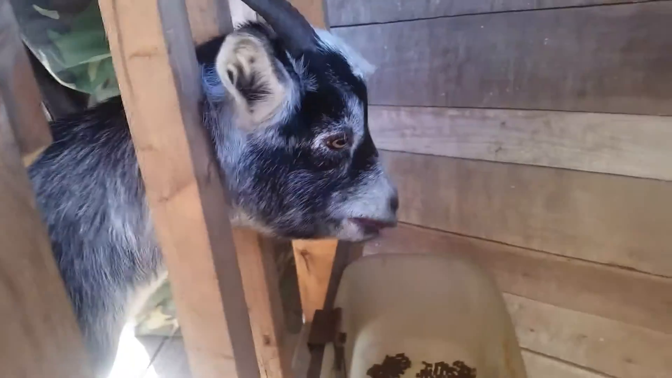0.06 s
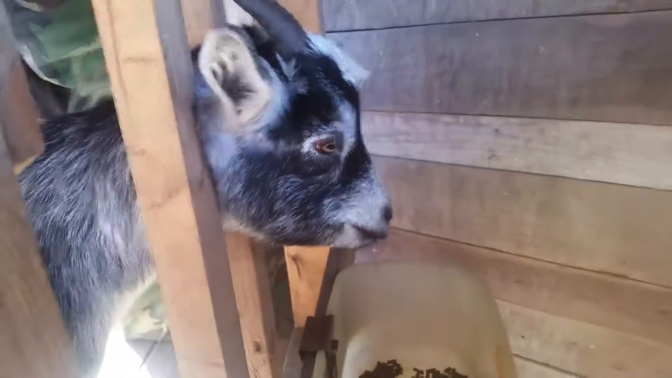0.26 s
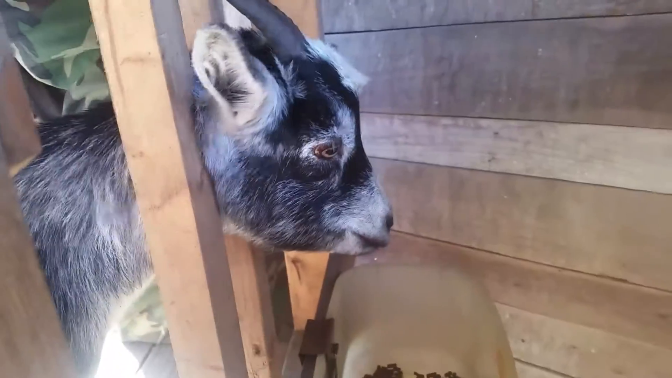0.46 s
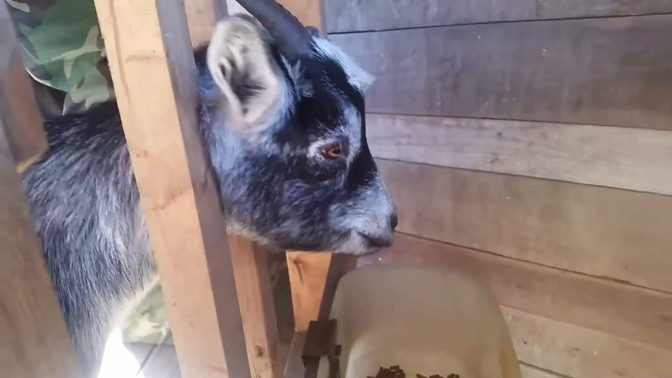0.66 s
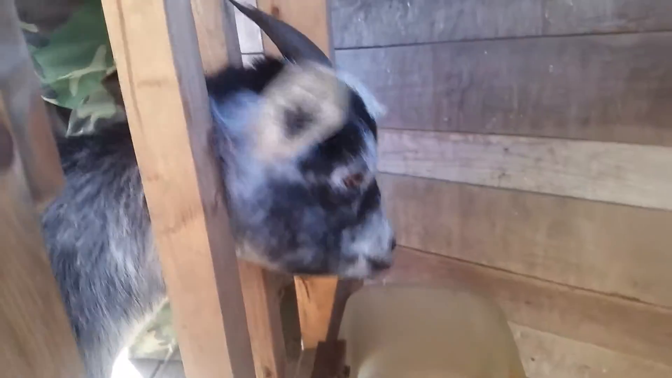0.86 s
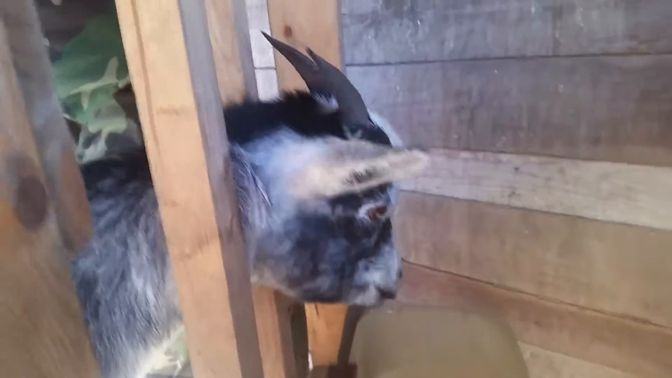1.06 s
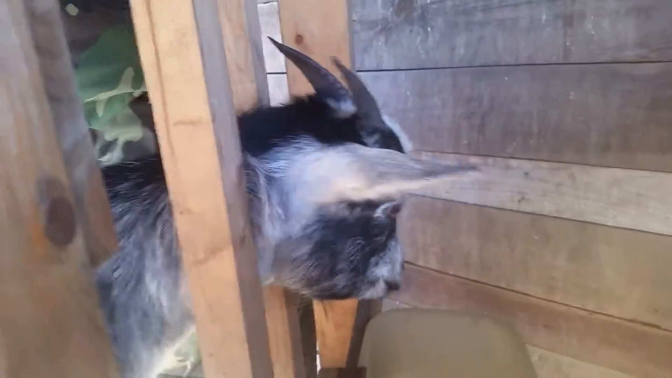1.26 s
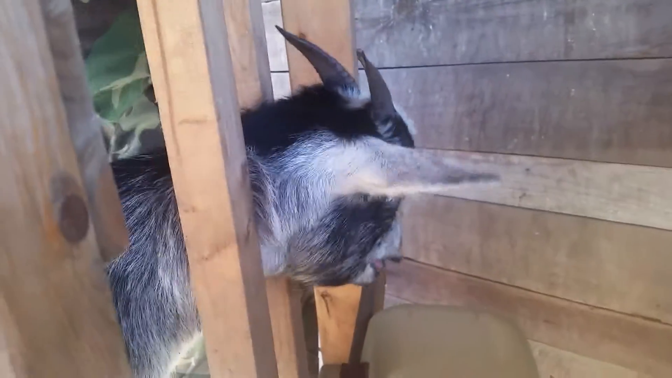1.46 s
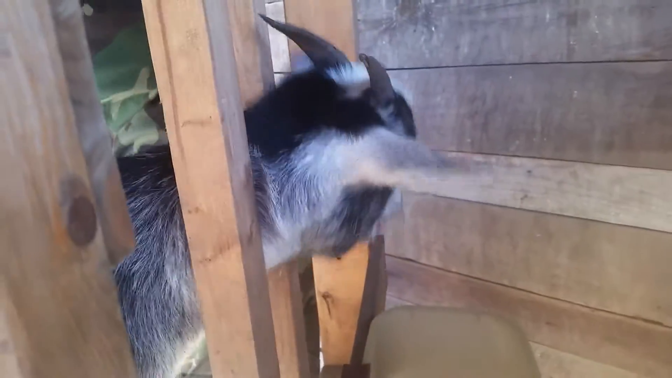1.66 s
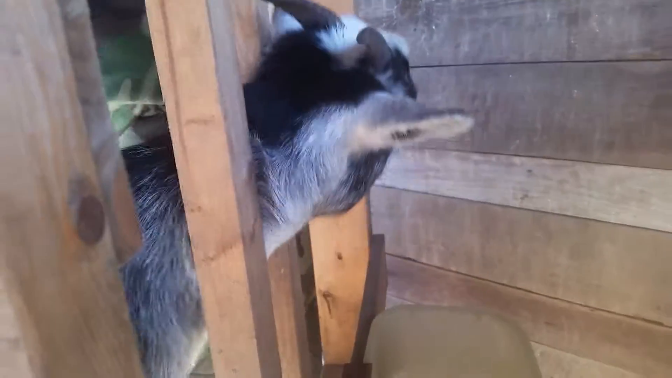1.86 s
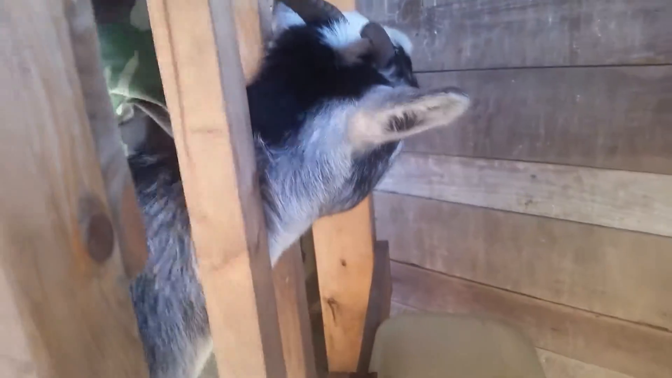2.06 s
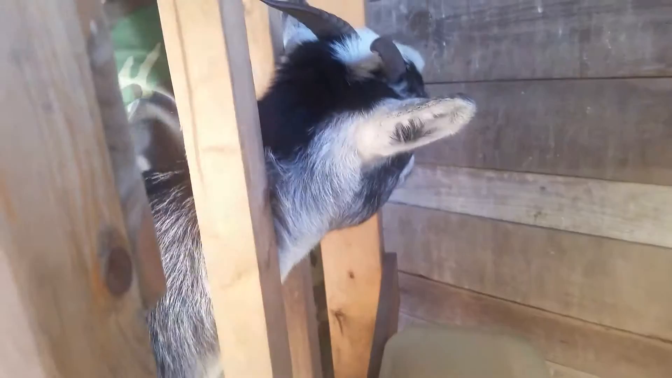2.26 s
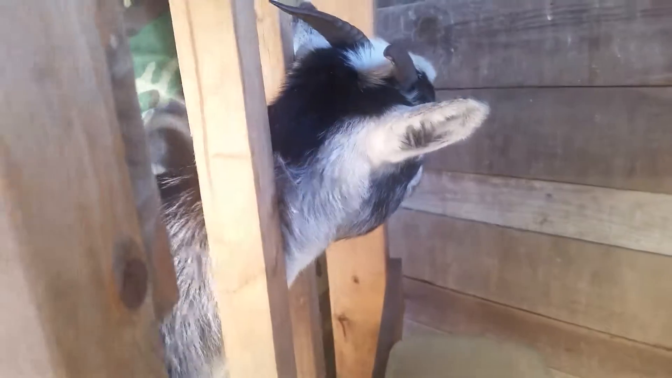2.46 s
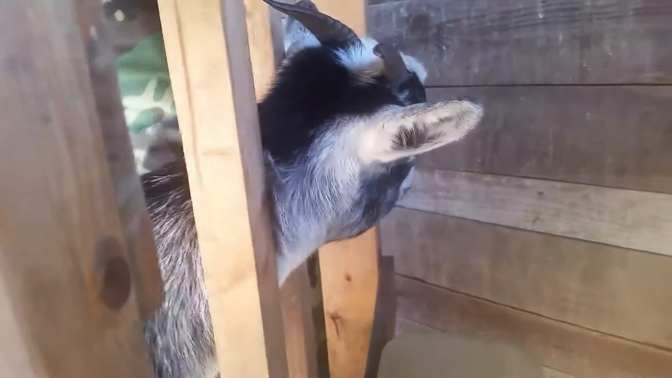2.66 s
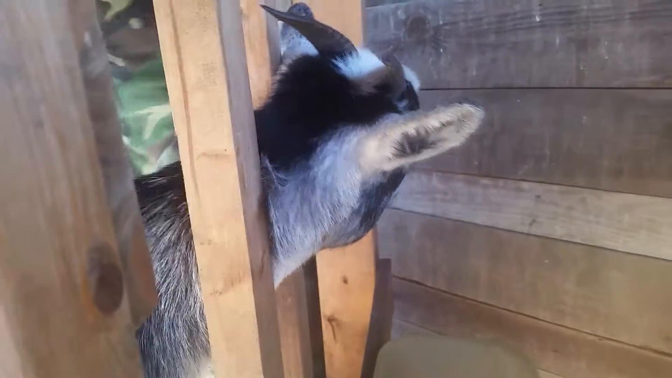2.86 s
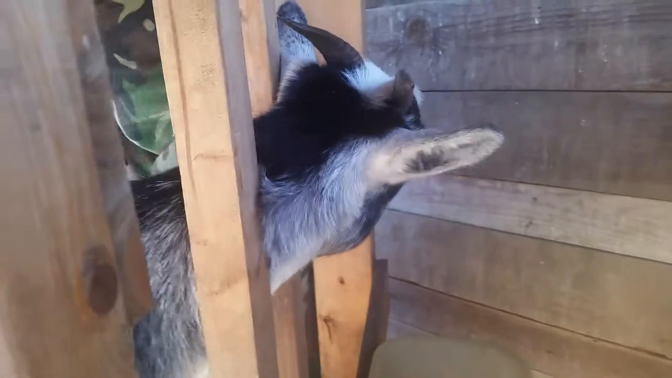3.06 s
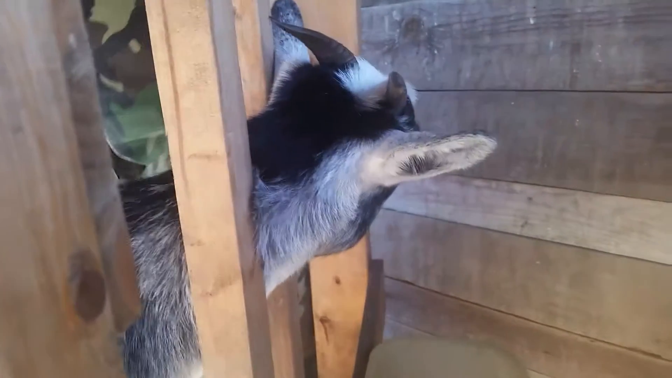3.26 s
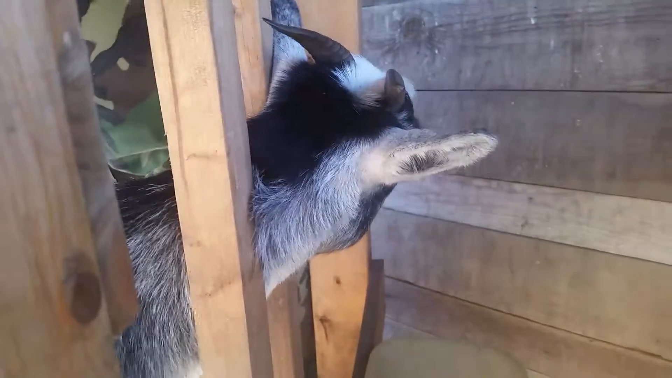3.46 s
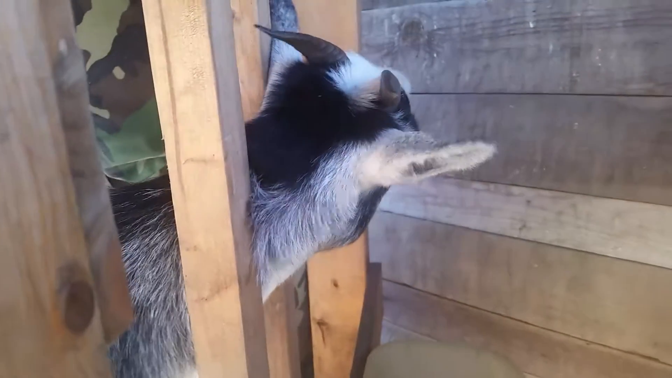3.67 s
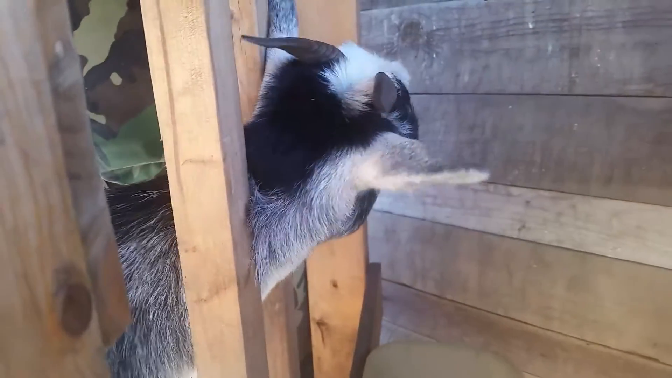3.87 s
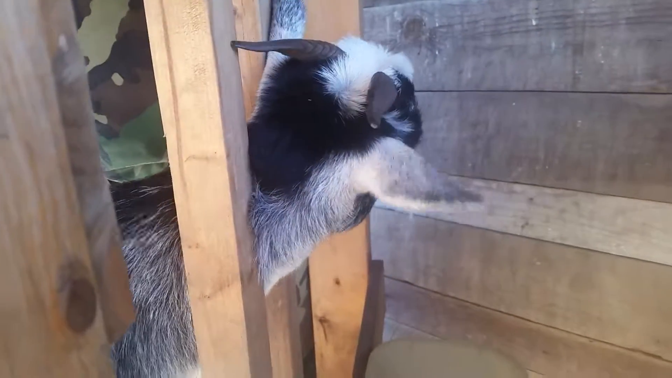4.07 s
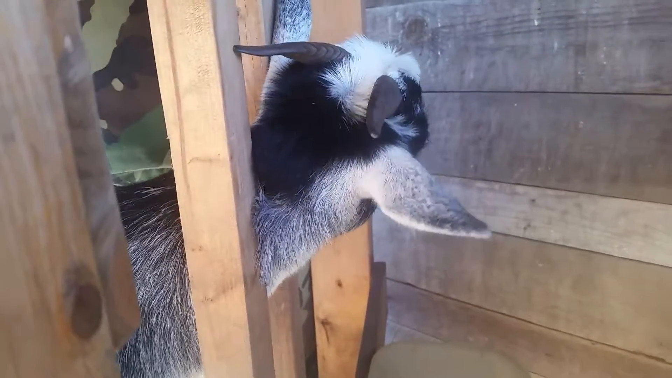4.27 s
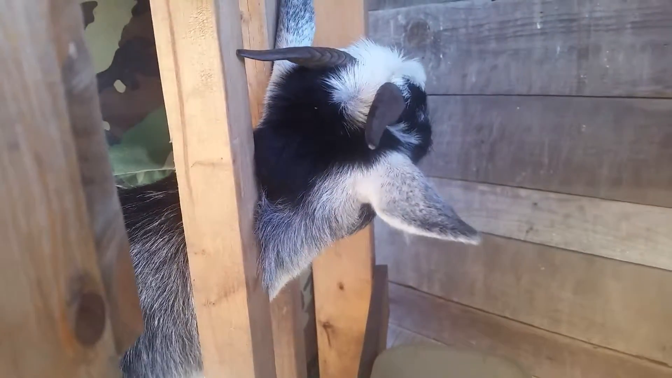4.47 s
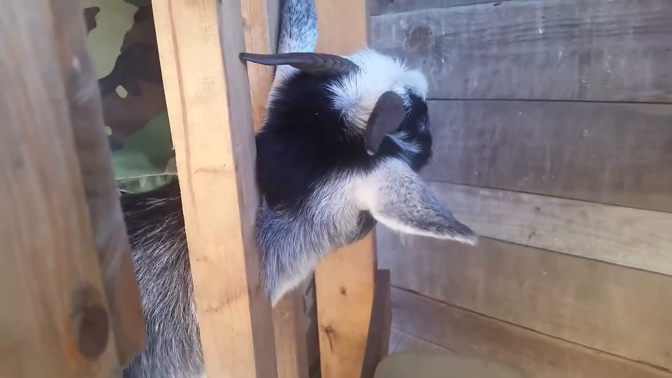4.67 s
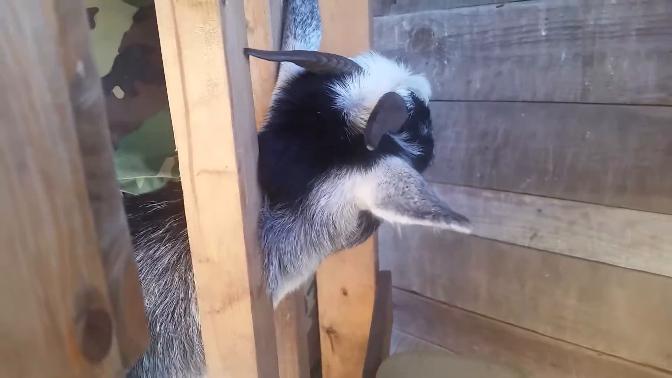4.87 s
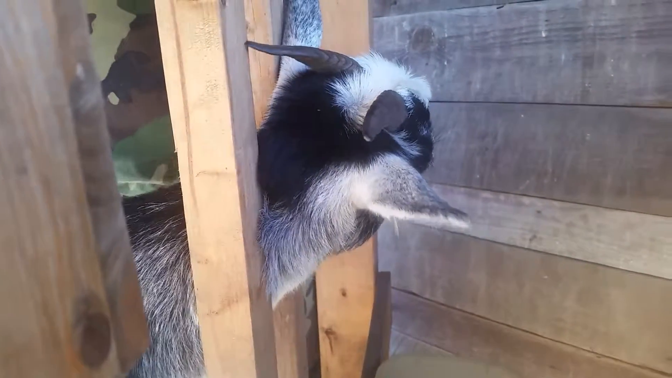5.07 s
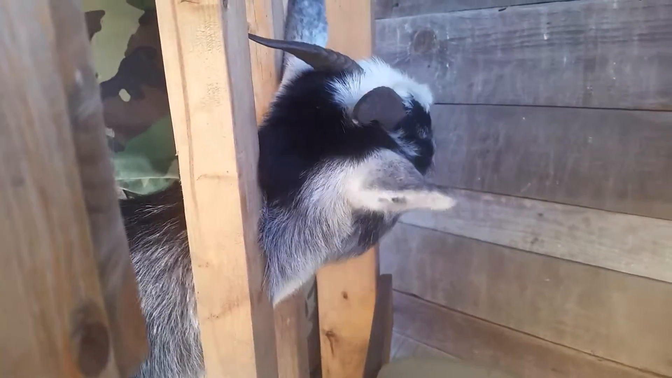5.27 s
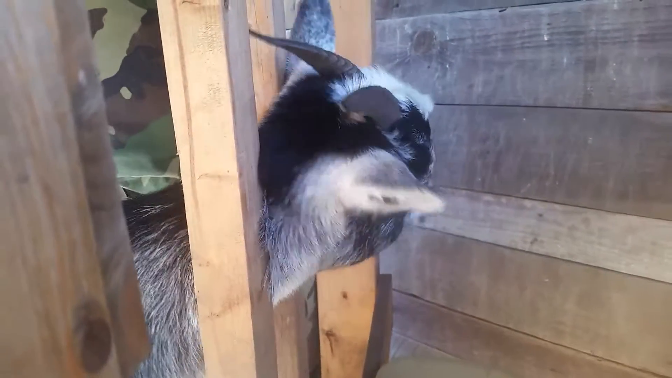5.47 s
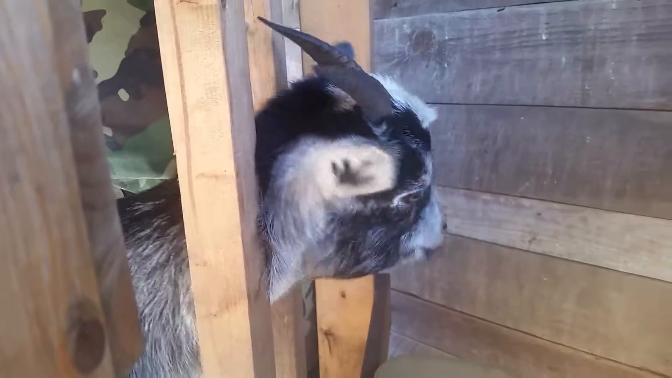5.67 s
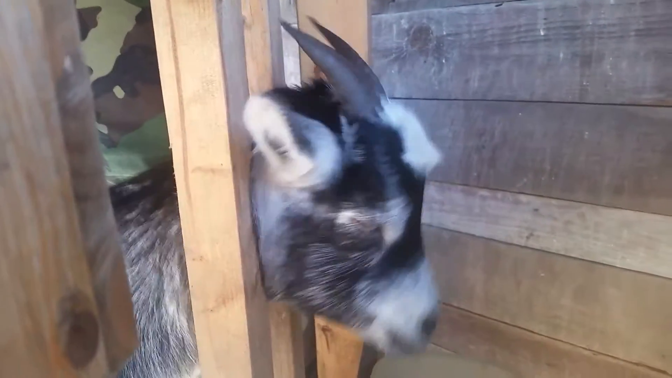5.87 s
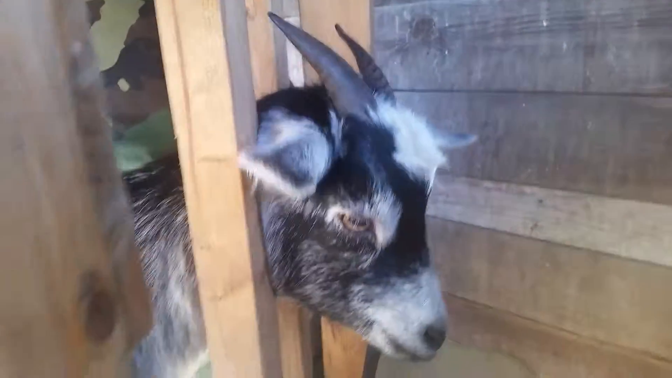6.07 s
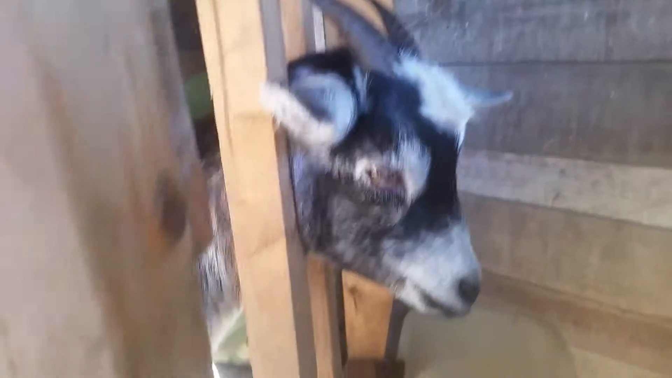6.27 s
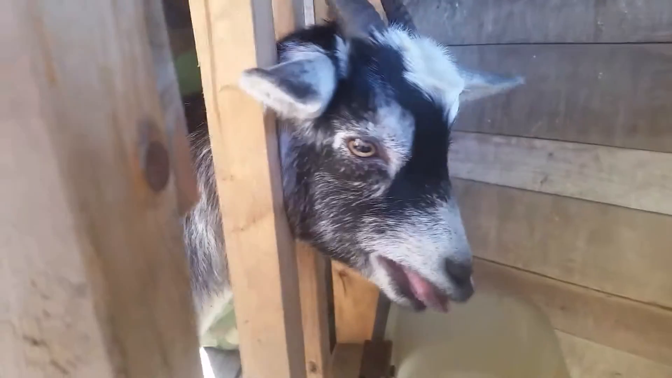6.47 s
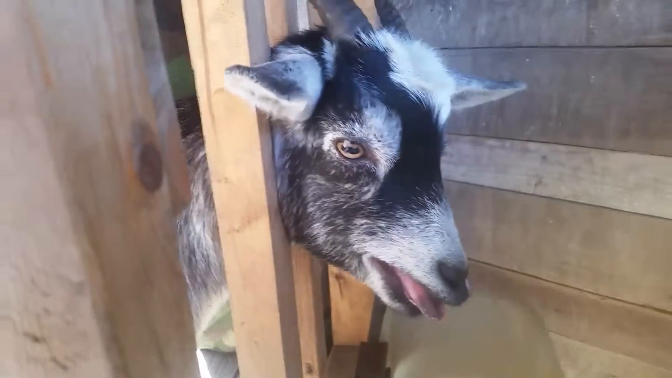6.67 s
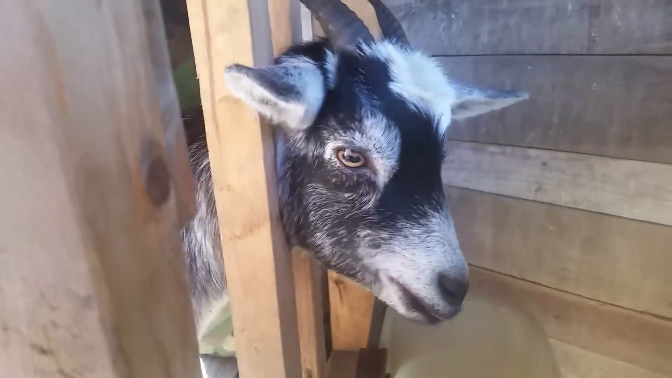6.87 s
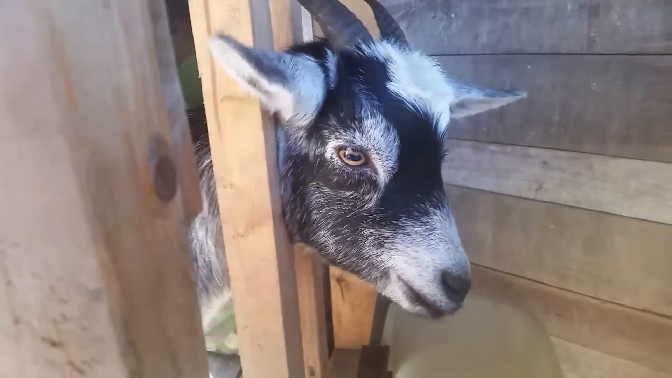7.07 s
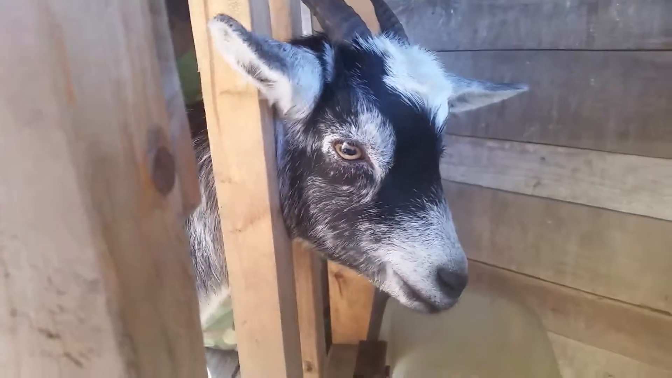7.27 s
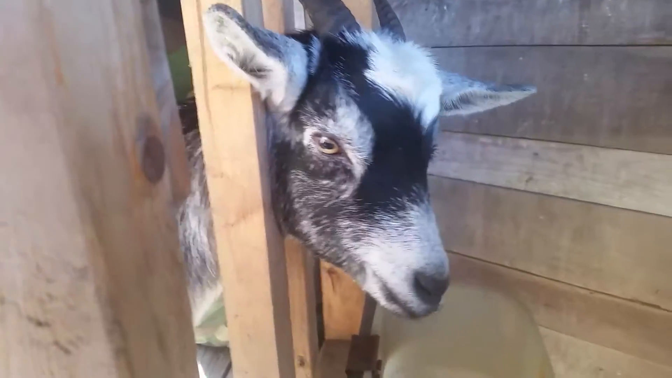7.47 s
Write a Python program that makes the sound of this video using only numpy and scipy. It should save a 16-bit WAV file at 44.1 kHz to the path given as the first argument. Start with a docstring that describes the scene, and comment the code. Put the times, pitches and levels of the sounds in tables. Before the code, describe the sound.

A young goat's quavering bleats, the tail of one and then three more, close in a wooden stall with ticks, rustling straw and shrill insects.

```python
"""First comes the end of a young goat's bleat, then three more, from a head pushed through a stall's wooden bars.
The voice is quavering pulses mixed with breath that ring a throat; bars and planks answer with short echoes.
Hooves and bars tick and straw rustles, as short bursts and swells of shaped noise, with dull pushes on the wood.
Behind lie far rumble and insects shrilling on the left, both shaped noise. All is heard close, by a phone."""
import sys
import numpy as np
from scipy import signal
from scipy.fft import rfft, irfft, next_fast_len
from scipy.io import wavfile
from scipy.ndimage import uniform_filter1d, map_coordinates

SR = 44100
rng = np.random.default_rng(int(sys.argv[2]) if len(sys.argv) > 2 else 0)


def put_to_file(sound):
    """Save the sound as 16-bit audio at rate SR, in the file named by the first command-line argument."""
    columns = np.atleast_2d(sound).T  # one column per channel
    safe = np.clip(columns, -1, 1)
    whole_steps = np.round(safe * 32767)
    wavfile.write(sys.argv[1], SR, whole_steps.astype(np.int16))


N = 332073
TOP_HZ = 15900  # highest overtone of the voice, and the phone's band limit


def amp(db):
    """Turn decibels into a plain multiplier."""
    return 10 ** (np.asarray(db) / 20)


def unit(x):
    """Scale to an average (rms) strength of 1."""
    return x / np.sqrt(np.mean(x ** 2) + 1e-20)


def along(points, hz):
    """Read a (frequency, value) curve on a log frequency axis."""
    f, v = np.transpose(points)
    return np.interp(np.log(hz + 1), np.log(f + 1), v)


def curves(rows, t):
    """Read every column after the first as a curve over time."""
    s, *cols = np.transpose(rows)
    return [np.interp(t, s, c) for c in cols]


def wobble(rate, size):
    """A smooth random curve with rate random points a second."""
    points = rng.standard_normal(int(size * rate / SR) + 4)
    return map_coordinates(points, [np.arange(size) * rate / SR])


def swells(s, length, db):
    """A sum of bell-shaped rises in level."""
    t = np.arange(N) / SR
    return sum(amp(c) * np.exp(-((t - a) / b) ** 2) for a, b, c in zip(s, length, db))


def filtered(x, response):
    """Multiply the spectrum of x by a response that depends on frequency."""
    n = x.shape[-1]
    m = next_fast_len(n + 8192)  # spare room for ringing
    return irfft(rfft(x, m) * response(np.fft.rfftfreq(m, 1 / SR)), m)[..., :n]


def band(c_hz, width_hz):
    """One resonance that rings after it is struck, with gain 1 at its centre."""
    return lambda f: 1j * f * width_hz / (c_hz * c_hz - f * f + 1j * f * width_hz)


def rush(spectrum, alike, left_db, patchy_db):
    """Shaped stereo noise with random louder patches; its left-right average has strength 1."""
    z = signal.stft(rng.standard_normal((2, N)), nperseg=512)[2]
    field = rng.standard_normal(z.shape[1:])
    field = uniform_filter1d(uniform_filter1d(field, 6, 0), 10, 1)  # smooth over frequency, then time
    pair = signal.istft(z * amp(patchy_db * unit(field)), nperseg=512)[1][:, :N]
    turn = np.arccos(np.clip(alike, 0, 1)) / 2  # more alike: less of the side signal
    shaped = filtered(pair, lambda hz: amp(along(spectrum, hz)))
    mid, side = shaped * [[np.cos(turn)], [np.sin(turn)]]
    both = np.array([mid + side, mid - side]) * amp([[left_db / 2], [-left_db / 2]])
    return both / np.std(both.mean(axis=0))


# rise and fall of the far rumble: (time [s], level [dB])
RUMBLE_LEVEL = [(0, -46.5), (.4, -56.5), (2.4, -49.5), (3.4, -46), (4.3, -54.5), (6.4, -52.5), (7.3, -50)]
# its tone colour, only the shape counts: (frequency [Hz], density [dB per Hz])
RUMBLE_COLOUR = [(12, -42), (20, -11.5), (54, -0.5), (92, 2.5), (168, -5), (225, -6), (400, -23),
                 (520, -40), (880, -120)]


def far_rumble():
    """Low noise, nearly the same in both ears, slowly changing in level."""
    level = amp(curves(RUMBLE_LEVEL, np.arange(N) / SR)[0])
    return level * rush(RUMBLE_COLOUR, .93, left_db=-1.0, patchy_db=-0.5)


# tone colour of the insects, only the shape counts: (frequency [Hz], density [dB per Hz])
INSECT_COLOUR = [(1940, -34), (3300, -20), (3390, -5), (4020, 6.5), (4450, 3), (5500, -7.5), (7150, -25.5),
                 (12100, -120)]


def insects():
    """A steady shrill band of noise, far stronger on the left."""
    return amp(-64.5) * rush(INSECT_COLOUR, .05, left_db=19.0, patchy_db=0.5)


# straw and fur rubbing: (time [s], half length [s], rustle level [dB], hiss level [dB])
STRAW_RUBS = [(.15, .1, -55, -56), (.93, 0.031, -62, -62.5), (1.27, 0.11, -66, -70.5),
              (2.11, 0.037, -55.5, -47), (2.3, 0.12, -67, -62), (2.55, .15, -72.5, -56),
              (2.82, 0.12, -50.5, -49), (3, 0.59, -66, -62.5), (5.31, 0.016, -49, -64.5),
              (7.1, .08, -66.5, -78.5)]
# tone colours, only the shape counts: (frequency [Hz], density [dB per Hz])
RUSTLE_COLOUR = [(240, -31.5), (400, -1.5), (470, 2), (1130, -3.5), (3400, -8), (4420, -43.5), (7480, -120)]
HISS_COLOUR = [(3180, -37.5), (5400, -8), (6830, -9), (9980, -5.5), (15900, -2.5)]


def straw():
    """Rubbing makes a middle rustle and a high hiss swell over a faint steady bed."""
    s, length, rustle_db, hiss_db = np.transpose(STRAW_RUBS)
    rustle_level = amp(-64) + swells(s, length, rustle_db)
    hiss_level = amp(-67) + swells(s, length, hiss_db)
    rustle = rustle_level * rush(RUSTLE_COLOUR, .15, left_db=1.5, patchy_db=1.5)
    hiss = hiss_level * rush(HISS_COLOUR, .05, left_db=-2.5, patchy_db=1.5)
    return rustle + hiss


# dull pushes on the wood: (time [s], half length [s], level [dB])
PUSHES = [(0.096, 0.033, -34.5), (0.154, 0.083, -44), (1.327, 0.32, -54), (1.821, 0.041, -44),
          (2.566, 0.035, -37), (2.828, 0.1, -48), (3.3, 0.38, -67), (7.05, 0.095, -52.5)]
# their tone colour, only the shape counts: (frequency [Hz], density [dB per Hz])
PUSH_COLOUR = [(100, -11.5), (220, 0), (450, -7.5), (900, -34.5)]


def wood_pushes():
    """Pressing on the wood gives soft swells of low noise, much alike in both ears."""
    return swells(*np.transpose(PUSHES)) * rush(PUSH_COLOUR, 0.94, left_db=-1.5, patchy_db=-2.0)


def yard():
    """Everything around the goat except the separate ticks."""
    return far_rumble() + insects() + straw() + wood_pushes()


# hooves and bars: (time [s], knock level [dB], thud over knock [dB], crack over knock [dB])
CONTACTS = [(0.164, -32.5, 5, -9.5), (0.466, -48.5, -4, -4), (0.489, -58, 14.5, -13), (0.901, -46, -18, 3),
            (0.91, -53.5, -14, 10.5), (1.164, -63.5, -10, 11.5), (1.239, -45, -19, -6.5),
            (1.264, -39, -6, -12), (2.159, -51, 1, -10.5), (2.923, -47.5, -7, -2),
            (2.981, -58.5, -22, 18.5), (3.001, -50, -3, 11), (3.127, -59.5, -19, 11.5), (3.458, -55, -8, 6),
            (3.49, -45.5, -4, -16.5), (5.169, -55, -10, 8), (5.29, -29, -18, -18), (5.295, -51.5, -7, 4),
            (5.329, -52.5, 5, -2.5)]


def ticks():
    """Each contact is a woody knock, a treble crack and a low thud, each dying at its own speed."""
    out, t = np.zeros((2, N + SR)), np.arange(SR // 4) / SR
    onset = 1 - np.exp(-t / 0.0005)
    for s, db, thud_db, crack_db in CONTACTS:
        noise = rng.standard_normal((3, 2, len(t)))
        noise[:, 1] = .7 * (noise[:, 0] + noise[:, 1])  # the right partly shares the left's noise
        knock = unit(filtered(noise[0], lambda f: band(950, 500)(f) + .5 * band(2300, 1500)(f)))
        crack = unit(filtered(noise[1], lambda f: band(9500, 5000)(f) ** 2))
        thud = unit(filtered(noise[2], lambda f: band(300, 250)(f) ** 2))
        # each part falls 60 dB in its own number of seconds
        hit = knock * amp(-60 * t / 0.021)
        hit = hit + crack * amp(crack_db - 60 * t / 0.022)
        hit = hit + thud * amp(thud_db - 60 * t / 0.13)
        start = round(s * SR)
        out[:, start:start + len(t)] += amp(db) * onset * hit * amp([[-1.5], [1.5]])
    return out[:, :N]


# how long the planks ring: (frequency [Hz], time to fall 60 dB [s])
PLANK_DECAY = [(300, 0.044), (2000, 0.096), (10000, 0.04)]


def planks(x):
    """The stall's short answer: fading noise as an echo, different at each microphone."""
    hz, t, z = signal.stft(rng.standard_normal((2, SR // 4)), SR, nperseg=256)
    t60 = along(PLANK_DECAY, hz)[:, None]
    tail = signal.istft(z * amp(-60 * t / t60) / np.sqrt(t60), SR, nperseg=256)[1]
    tail = tail / np.linalg.norm(tail[0])
    late = np.pad(x, (120, 0))[None]  # the answer starts 120 samples later
    return signal.fftconvolve(late, tail, axes=1)[:, :len(x)]


# quavers and short grunts, brief changes of pitch and level:
# (time [s], half length [s], pitch change [share], level change [dB])
QUAVER_MOMENTS = [(1.502, .015, 0.57, 3.5), (1.591, .02, 0.6, -1), (1.658, .024, 0.61, 0),
                  (1.791, 0.013, 0.034, 0.5), (4.147, 0.015, 0.43, -6.5), (4.259, 0.01, 0.037, -5.5),
                  (4.303, .022, .04, -0.5), (4.384, 0.021, .04, -1), (4.46, 0.025, .035, 2),
                  (6.338, 0.022, .12, 18.5), (6.605, .012, -.01, -2.5), (6.994, 0.015, 0.12, 10)]


def quavered(pitch, effort_db, t):
    """Quavers and short grunts: the pitch and the level of the voice change briefly together."""
    for s, length, change, db in QUAVER_MOMENTS:
        moment = np.exp(-np.abs((t - s) / length) ** 3)
        pitch, effort_db = pitch * (1 + change * moment), effort_db + db * moment
    return pitch, effort_db


def fold_pulses(pitch, phase, uneven):
    """Vocal-fold pulses built from 60 overtones, with every second pulse made different."""
    size = len(pitch)
    k = np.arange(1, 61)[:, None]
    soft = 1 / (1 + (k * pitch / 8000) ** 2) * (k * pitch < TOP_HZ)  # rounded pulses have little treble
    # the pulse shape keeps changing, each overtone its own way
    flutter = np.array([wobble(50, size=size) for _ in k])
    soft = soft * amp(4.5 * flutter * np.clip(k * pitch / 3000 - .5, .15, 1))
    pulses = np.sum(np.cos(k * phase - .12 * k ** 2) * soft, axis=0)
    pulses = pulses * (1 + uneven * 2 * np.cos(phase / 2))
    return pulses * amp(.8 * wobble(60, size=size)) * np.sqrt(pitch / 450)


def breathy_source(pitch, phase, uneven, breath):
    """Pulses mixed with breath noise that swells once a cycle, plus a treble rasp."""
    pulses = fold_pulses(pitch, phase, uneven)
    air = rng.standard_normal(len(pitch)) * (1 + .6 * np.cos(phase)) * np.sqrt(SR / 4 / 450)
    # turbulence blurs the treble even in clear notes
    rasp = .2 * filtered(air, lambda f: band(7500, 8500)(f) ** 2)
    return np.sqrt(1 - breath) * pulses + np.sqrt(breath) * .35 * air + rasp


def tract(source, throat, low_db, jaw):
    """The lowest resonance has its own strength; the others rise in pitch as the jaw drops."""
    (low_hz, low_width, db), *upper = throat
    lowest = filtered(source, lambda f: band(low_hz, low_width)(f) * band(low_hz, 900)(f))
    out = amp(db + low_db) * lowest
    for step in range(5):  # five jaw positions, cross-faded
        shift = .98 + .035 * step

        def rings(f):
            total = 0
            for i, (c, w, db) in enumerate(upper):
                ring = band(c * shift, w)(f) * band(c * shift, 3 * w)(f) ** .5
                total = total + (-1) ** (i + 1) * amp(db) * ring
            return total

        share = np.clip(1 - np.abs(4 * np.clip(jaw, 0, 1) - step), 0, 1)
        out = out + share * filtered(source, rings)
    return out


# the throat when the push is weak: (centre [Hz], width [Hz], level [dB])
SLACK_THROAT = [(850, 540, 2.5), (1688, 1300, 1), (3025, 1000, -13), (9000, 12000, -4.5)]


def slack_tract(source):
    """A weakly pushed throat rings in its own, looser set of resonances."""
    def rings(f):
        return sum((-1) ** i * amp(db) * band(c, w)(f) for i, (c, w, db) in enumerate(SLACK_THROAT))
    return filtered(source, rings)


def lips(f):
    """A small mouth sends out little bass, and the extreme treble is softened."""
    return (1j * f / 650 / (1 + 1j * f / 650)) ** 2 / (1 + 1j * f / 14000) ** 3


JAW_S = .04  # how gradually the jaw moves [s]
HUM_SHUT, LOW_SHUT = 0.58, .2  # dB gained by hum and lowest resonance per dB the mouth closes
HUM_WEAK = 0.91  # share of a fall in effort that the hum makes up for
SLACK_FROM_DB, SLACK_OVER_DB = -28, 10  # the throat slackens below this effort, fully this much lower [dB]


def bleat(rows, throat, mouth, uneven, breath, t):
    """Vocal-fold pulses and breath ring the throat and leave through the lips; a nasal hum is added."""
    pitch, effort_db, open_db = curves(rows, t)
    first, later, change_s, hum_db = mouth
    jaw = first + (later - first) * (1 + np.tanh((t - change_s) / JAW_S)) / 2
    pitch, effort_db = quavered(pitch, effort_db, t)
    loudest_db = effort_db.max()

    # fast glides and weak effort leak air
    glide = np.abs(np.gradient(np.log(pitch), t))
    weak = np.clip((loudest_db - 14 - effort_db) / 25, 0, 1)
    breath = np.clip(breath + .0025 * glide + .35 * weak, 0, 1)
    # the pitch jitters more as the voice gets breathier
    pitch = pitch * (1 + (.003 + .02 * breath) * wobble(120, size=len(t)))
    phase = 2 * np.pi * np.cumsum(pitch) / SR
    source = breathy_source(pitch, phase, uneven, breath)

    # a half-closed mouth keeps the low part
    dull = filtered(source, lambda f: 1 / (1 + 1j * f / 1500) ** 3)
    source = amp(effort_db) * (dull + amp(open_db) * (source - dull))

    hum_level = effort_db + hum_db - HUM_SHUT * open_db
    hum_level = hum_level + HUM_WEAK * np.clip(loudest_db - effort_db, 0, 30)
    hum = amp(hum_level + 2.1 * wobble(30, size=len(t))) * np.sin(phase)

    slack = np.clip((SLACK_FROM_DB - effort_db) / SLACK_OVER_DB, 0, 1)
    firm = tract(source, throat, -LOW_SHUT * open_db, jaw)
    return filtered((1 - slack) * firm + slack * slack_tract(source), lips) + hum


# one curve a bleat, before quavers and grunts:
# (time [s], pitch [Hz], effort [dB], mouth-open brightness [dB])
BLEAT_CURVES = [
    [(0, 664, -5, -5), (.024, 436.5, -18.5, 7.5), (.05, 383, -27, 4.5), (.075, 313.6, -18.5, -5.5),
     (.115, 245, -49, -3), (.14, 230, -75, -8)],
    [(1.362, 282.4, -82.5, -14), (1.372, 299.6, -31.5, -19.5), (1.41, 352.4, -31.5, -7.5),
     (1.44, 393, -41.5, 1), (1.495, 437.2, -4.5, -10.5), (1.7, 438.6, -11, -3.5), (1.76, 428, -21, 4.5),
     (1.85, 402.8, -24.5, 4), (1.91, 412.4, -26, 4.5), (1.975, 403, -27, 4), (2.03, 335, -16.5, -12.5),
     (2.08, 290, -69, -4)],
    [(3.99, 272.6, -71, -22.5), (3.998, 295.5, -36, -20.5), (4.04, 377.9, -31, -7),
     (4.09, 410.7, -33.5, -5.5), (4.125, 494.5, -8.5, -6.5), (4.19, 493, -7.5, -10),
     (4.205, 705, -18.5, -1), (4.23, 733, -17.5, 3), (4.48, 742.3, -20.5, 3.5), (4.53, 663, -17.5, -1),
     (4.555, 516, -9.5, -8.5), (4.6, 360, -35, 7.5), (4.675, 256.3, -26.5, -10), (4.715, 230.4, -47.5, -9),
     (4.735, 227.6, -31, -20), (4.77, 227, -74.5, -22)],
    [(6.3, 255, -53.5, -28), (6.37, 334.3, -41.5, -3), (6.425, 466.3, -25, -8.5), (6.455, 474, -24.5, -6),
     (6.48, 485.5, -11.5, -5.5), (6.51, 493.3, -15, -5), (6.532, 449.4, -22.5, 3),
     (6.605, 440.5, -16, -1.5), (6.645, 456.7, -17, 1), (6.7, 446, -19, 1.5), (6.82, 432.1, -18.5, 0.5),
     (6.835, 423, -23, 0.5), (6.865, 405.2, -20.5, -3), (6.915, 250.4, -24, -8.5), (6.96, 227, -33.5, -10),
     (7.04, 239.5, -64, -22)],
]
# throat and mouth resonances of each bleat, lowest first: (centre [Hz], width [Hz], level [dB])
BLEAT_THROATS = [
    [(956, 440, -2.5), (1980, 90, -12), (2600, 250, -10), (3740, 170, -7.5), (6300, 3300, -25),
     (9130, 900, -23.5)],
    [(975.5, 94, 6.5), (2268, 188, 4), (2789, 95, 0.5), (3800, 1200, -12.5), (5380, 1500, -14),
     (9000, 9300, -14.5)],
    [(930, 236, 6), (2116, 170, 7), (3020, 360, -5.5), (3520, 150, -0.5), (4240, 250, -9.5),
     (8880, 3200, -13.5)],
    [(983, 343, 3.5), (1810, 450, -0.5), (2250, 130, 9), (3090, 690, -3.5), (3915, 376, -1.5),
     (8640, 6500, -12.5)],
]
# each bleat: (jaw drop at first [0-1], later [0-1], time of change [s], basic nasal hum over effort [dB])
JAW_MOVES = [(0.33, 0.14, 0.062, -43.5), (.1, 0.8, 1.81, -45), (.2, .05, 6.8, -37.5),
             (0.3, 0.7, 6.75, -40.5)]
# each bleat: (how much every second pulse differs [0-1], least breath share [0-1])
ROUGHNESS = [(0, .1), (.02, .02), (.07, .07), (0, .008)]
# nearest echo of each bleat, levels above 0 play as 0:
# (left delay [ms], left level [dB], right delay [ms], right level [dB])
BAR_ECHOES = [(0.436, 3, .9, 24), (0.62, -20.5, .3, -11.5), (0.55, -10.5, 0.877, -46.5),
              (0.18, -7, 0.6, -16)]
# how the phone's two ports differ: (frequency [Hz], left minus right [dB])
PORT_DIFFERENCE = [(60, -1.5), (100, -3.5), (180, -1), (310, -1), (550, -2), (950, -5), (1650, -8),
                   (2860, 0.5), (4970, 8), (8640, -4.5), (15000, -12)]


def goat():
    """Each bleat reaches the two ports with its own nearest echo, as the head turns; the left hears it first."""
    out = np.zeros((2, N + SR))
    half = np.array([[.5], [-.5]])  # share any difference between left and right
    for rows, throat, mouth, rough, bar in zip(BLEAT_CURVES, BLEAT_THROATS, JAW_MOVES, ROUGHNESS, BAR_ECHOES):
        start_s, end_s = rows[0][0], rows[-1][0]
        a = round(max(start_s, 0) * SR)
        t = np.arange(a, round(end_s * SR) + SR // 4) / SR  # room for the echoes
        voice = bleat(rows, throat, mouth, *rough, t) * (t < end_s)
        ms, db = np.reshape(bar, (2, 2, 1)).transpose(1, 0, 2)
        echo = amp(np.minimum(db, 0))
        near = filtered(voice, lambda hz: 1 + echo * np.exp(-2j * np.pi * hz * ms / 1000))
        out[:, a:a + len(t)] += near + amp(-5) * planks(voice)

    def ports(hz):
        lead = np.exp(2j * np.pi * hz * half * .00003)  # the left leads by 0.03 ms
        return amp(along(PORT_DIFFERENCE, hz) * half) * lead

    return filtered(out[:, :N], ports)


def scene():
    """Yard, ticks and goat together."""
    return yard() + ticks() + goat()


def record(dry):
    """The phone rounds off the highest peaks and keeps nothing above its band limit."""
    rounded = dry / (1 + np.abs(dry / .97) ** 8) ** (1 / 8)
    return filtered(rounded, lambda hz: hz < TOP_HZ)


dry = scene()
out = record(dry)
put_to_file(out)
```